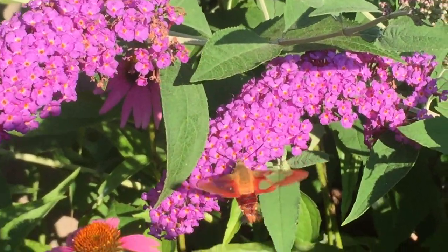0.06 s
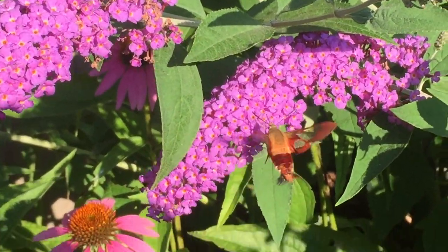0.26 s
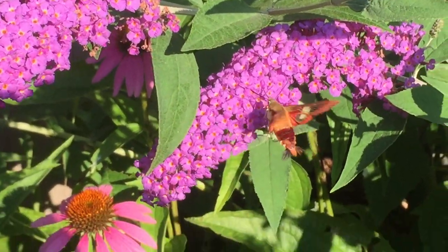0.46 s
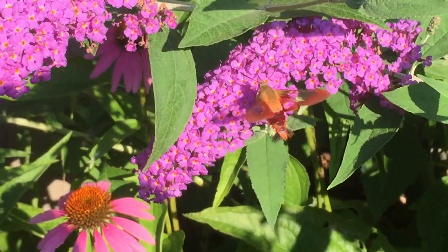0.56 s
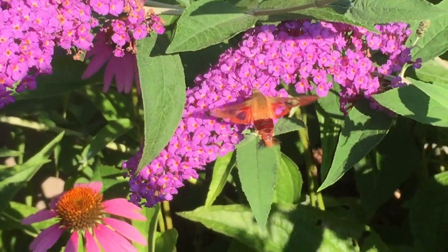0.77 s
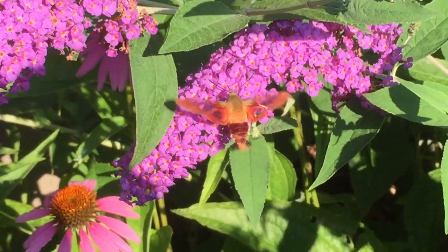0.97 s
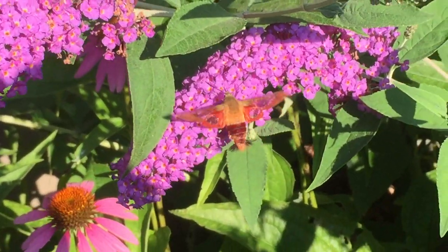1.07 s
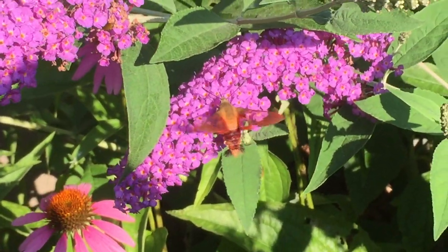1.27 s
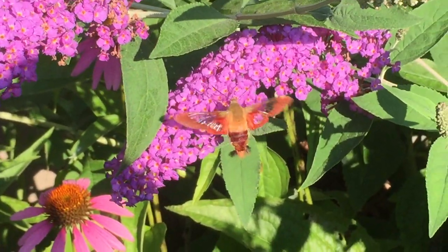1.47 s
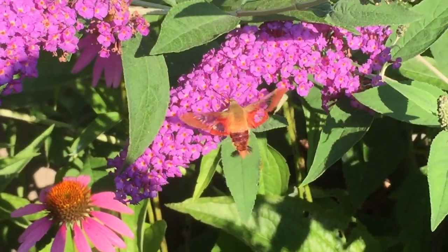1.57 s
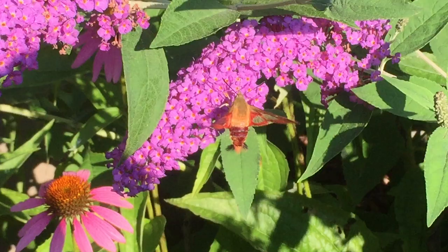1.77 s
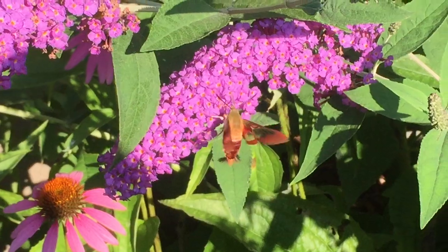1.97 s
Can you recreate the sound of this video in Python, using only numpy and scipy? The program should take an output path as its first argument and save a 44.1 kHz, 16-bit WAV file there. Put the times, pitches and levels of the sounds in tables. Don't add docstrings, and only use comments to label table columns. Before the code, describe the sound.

A cricket some way off trills about twelve near-pure high chirps a second over soft garden hiss; close to the hand-held microphone, dull thumps and two hollow knocks come in the first half second, then mostly calm.

```python
import sys
import numpy as np
from scipy import signal
from scipy.fft import rfft, irfft
from scipy.io import wavfile
from scipy.ndimage import uniform_filter1d

SR = 44100
rng = np.random.default_rng(int(sys.argv[2]) if len(sys.argv) > 2 else 0)


def gain_from_decibels(decibels):
    exponent = np.asarray(decibels, float) / 20
    return 10 ** exponent


def generate_wav(signal):
    frames = np.transpose(np.atleast_2d(signal))
    scaled = np.clip(frames, -1, 1) * 32767
    pcm = np.round(scaled).astype(np.int16)
    wavfile.write(sys.argv[1], SR, pcm)


N = 88200


def add(out, x, at_s):
    i = int(round(at_s * SR))
    a, b = max(i, 0), min(i + len(x), N)
    out[a:b] += x[a - i:b - i]


def walk(rate_hz):
    k = int(SR / rate_hz)
    steps = np.repeat(rng.standard_normal(N // k + 1), k)
    return 1.3 * uniform_filter1d(uniform_filter1d(steps, k), k)[:N]


def band(x, order, low_hz, high_hz):
    return signal.sosfilt(signal.butter(order, [low_hz, high_hz], "band", fs=SR, output="sos"), x)


def hiss(shape, db, swell_db, flicker_db, flicker_hz):
    f = np.maximum(np.fft.rfftfreq(N, 1 / SR), 1)
    hz, per_hz = np.array(shape, float).T
    colour_db = np.interp(np.log(f), np.log(hz), per_hz, left=-80, right=-80)
    spectrum = rfft(rng.standard_normal(N)) * gain_from_decibels(colour_db)
    out, swell = 0, walk(2.3)
    for k in range(8, 30):
        share = np.clip(1 - np.abs(2 * np.log2(f) - k), 0, 1)
        out = out + irfft(spectrum * share, N) * gain_from_decibels(swell_db * swell + flicker_db * walk(flicker_hz))
    return out * gain_from_decibels(db) / np.std(out)


# frequency in Hz, density in dB per Hz.
AIR = [(180, -19.5), (500, -23.5), (2300, -28.5), (3200, -32), (7000, -35.5), (10400, -42.5), (12500, -41),
       (15800, -45)]
# frequency in Hz, density in dB per Hz.
CHORUS = [(1700, -31), (1950, -1), (2250, -19), (2600, 0), (2800, -17)]


def garden_air():
    air = hiss(AIR, db=-71, swell_db=.25, flicker_db=.5, flicker_hz=12.57)
    return air + hiss(CHORUS, db=-82.5, swell_db=0.69, flicker_db=0.82, flicker_hz=25)


# frequency in Hz, density in dB per Hz.
RUMBLE = [(20, -27), (35, -10.5), (55, 5), (80, -5.5), (125, -2), (190, -13), (400, -36.5)]
# time in seconds, level in dB.
GRIP = [(0, 11), (.1, 8.5), (.3, 4), (.55, 4.5), (.8, 0.5), (1.3, 1), (2, 2.5)]


def hand_rumble():
    rumble = hiss(RUMBLE, db=-68.5, swell_db=0, flicker_db=3, flicker_hz=6.9)
    return rumble * gain_from_decibels(np.interp(np.arange(N) / SR, *np.array(GRIP).T))


# centre in seconds, peak in dB, pitch at the top of the arch in Hz.
CHIRPS = [(.043, -73, 5986), (.117, -76, 6094), (.196, -71, 6094), (.272, -66, 6126), (.357, -70.5, 6150),
          (.438, -73, 6140), (.519, -69.5, 6245), (.596, -69.5, 6239), (.68, -70, 6234),
          (.758, -68.7, 6250), (.839, -71, 6260), (.917, -68.8, 6266), (.997, -65, 6420),
          (1.081, -65.3, 6277), (1.163, -67, 6410), (1.244, -69.8, 6415), (1.325, -71.5, 6320),
          (1.409, -70, 6417), (1.489, -71, 6410), (1.569, -65.5, 6261), (1.648, -69.8, 6400),
          (1.73, -65, 6401), (1.808, -68.7, 6379), (1.888, -70.3, 6430), (1.967, -70.7, 6428)]
# delay in seconds, level in dB.
HEDGE_ECHOES = [
    (.006, -15),
    (.017, -16),
]


def cricket():
    rise_s, fall_s, rise_sharpness, fall_sharpness = 0.012, .013, 3.4, 1.8
    rise_sag_hz, fall_sag_hz = 70, 70
    sag_from_hz, sag_per_hz = 6100, .6
    out, t = np.zeros(N), np.arange(-.04, .04, 1 / SR)
    u = np.where(t < 0, -t / rise_s, t / fall_s)
    shape = np.exp(-u ** np.where(t < 0, rise_sharpness, fall_sharpness))
    for at, db, top_hz in CHIRPS:
        extra = sag_per_hz * max(top_hz - sag_from_hz, 0)
        sag = np.where(t < 0, rise_sag_hz + .3 * extra, fall_sag_hz + extra) * u ** 2
        tone = np.sin(2 * np.pi * np.cumsum(top_hz - sag) / SR)
        add(out, gain_from_decibels(db) * shape * tone, at + t[0])
    out = out * gain_from_decibels(-0.63 + 2.6 * walk(400))
    return out + sum(gain_from_decibels(db) * np.roll(out, int(s * SR)) for s, db in HEDGE_ECHOES)


def sagging_pulses(table, rise_cycles, fall_cycles, sag):
    out = np.zeros(N)
    for at, db, hz in table:
        cycles = np.arange(-3, 5, hz / SR)
        shape = np.exp(-(cycles / np.where(cycles < 0, rise_cycles, fall_cycles)) ** 2)
        tone = np.cos(2 * np.pi * (cycles - sag * cycles ** 2))
        add(out, gain_from_decibels(db) * shape * tone, at + cycles[0] / hz)
    return out


# centre in seconds, peak in dB, pitch in Hz.
BUMPS = [(.046, -55, 470), (.06, -52, 490), (.08, -55, 362), (.183, -56.5, 450), (.192, -55.5, 268),
         (.203, -55, 510), (.262, -55, 300), (.27, -48, 490), (.287, -38.5, 454), (.286, -54, 1000),
         (.29, -48, 286), (.443, -54, 487), (1.3775, -50.5, 480), (.32, -43, 484)]


def finger_bumps():
    return sagging_pulses(BUMPS, rise_cycles=0.69, fall_cycles=1.83, sag=0.024)


# centre in seconds, peak in dB, pitch in Hz.
THUMPS = [(.0549, -55, 150), (.0626, -44.5, 142), (.0634, -59.5, 58), (.0896, -45.5, 95.5),
          (.1201, -55, 107), (.155, -52.5, 102), (.1892, -43, 137), (.2068, -39, 81.3), (.2414, -61, 55),
          (.2493, -47.5, 123), (.2683, -46, 150), (.2885, -34.5, 155), (.2974, -37, 94), (.3123, -46.5, 70),
          (.3336, -32.5, 135), (.3459, -46.5, 75), (.4732, -48, 78), (.4878, -28, 121.6),
          (.5315, -45.5, 65), (.5507, -54, 61), (.6786, -51.5, 62.3), (.722, -54.5, 74), (.83, -64.5, 59),
          (1.0104, -47, 63), (1.082, -53.5, 61), (1.1743, -55.5, 60), (1.3944, -45, 92.4),
          (1.63, -51.5, 64), (1.83, -59, 55.4), (1.947, -57, 90)]


def grip_thumps():
    return sagging_pulses(THUMPS, rise_cycles=0.71, fall_cycles=1.29, sag=0.17)


# centre in seconds, level in dB, length in seconds, low Hz,
# high Hz.
RUSTLES_AND_BIRD = [
    (.12, -88, .04, 12500, 15000),
    (.27, -85, .04, 14000, 16000),
    (0.26, -74, 0.0082, 2800, 3300),
    (0.298, -78, 0.022, 2880, 3400),
    (.55, -83, .025, 11500, 15500),
    (0.546, -77.5, .01, 3050, 3700),
    (0.22, -87.5, .35, 11500, 15500),
]


def rustles_and_bird():
    out, t = np.zeros(N), np.arange(N) / SR
    for at, db, length_s, low_hz, high_hz in RUSTLES_AND_BIRD:
        breath = band(rng.standard_normal(N), 2, low_hz, high_hz)
        level = gain_from_decibels(db + 3.5 * walk(150))
        out += level * breath / np.std(breath) * np.exp(-((t - at) / length_s) ** 2)
    return out


# start in seconds, peak in dB.
TICKS = [(.13, -66), (.279, -68), (.335, -68), (.897, -66), (.98, -69), (1.03, -65), (1.145, -67),
         (1.33, -63), (1.53, -68), (1.63, -66), (1.93, -65)]


def leaf_ticks():
    tick_hz, fall_ms = 13000, .4
    out, t = np.zeros(N), np.arange(0, .003, 1 / SR)
    for at, db in TICKS:
        grain = rng.standard_normal(len(t))
        add(out, gain_from_decibels(db) * np.exp(-t * 1000 / fall_ms) * grain, at)
    return band(out, 2, .7 * tick_hz, 1.2 * tick_hz)


# start in seconds, ring in dB, tick in dB.
KNOCKS = [
    (0.3248, -23, -56.5),
    (.479, -19, -47),
]
# pitch in Hz, level in dB, fall in ms.
CASE = [(950, 6, 2.5), (1370, -5, 4), (1660, -7, 3.5), (2010, 2, 3), (2300, 0, 2), (3500, -14, 1),
        (4200, -12, 1.2)]


def knocks():
    ring_hz, sharp_hz, settle_ms = 503.8, 300, 1.17
    ring_late_ms, ring_rise_ms, ring_fall_ms, tick_rise_ms = 0.79, 1.49, 7.34, .9
    out, t = np.zeros(N), np.arange(0, .05, 1 / SR)
    ms = t * 1000
    tick = np.zeros(len(t))
    for k, (hz, db, fall_ms) in enumerate(CASE):
        sign = (-1) ** k
        tick += sign * gain_from_decibels(db) * np.exp(-ms / fall_ms) * np.sin(2 * np.pi * hz * t)
    tick = tick * (1 - np.exp(-(ms / tick_rise_ms) ** 2))
    pitch = ring_hz + sharp_hz * np.exp(-ms / settle_ms)
    shape = (1 - np.exp(-(ms / ring_rise_ms) ** 2)) * np.exp(-(ms / ring_fall_ms) ** 1.45)
    ring = shape * np.sin(2 * np.pi * np.cumsum(pitch) / SR)
    for at, ring_db, tick_db in KNOCKS:
        add(out, gain_from_decibels(tick_db) * tick, at)
        add(out, gain_from_decibels(ring_db) * ring, at + ring_late_ms / 1000)
    return out


def scene():
    garden = garden_air() + cricket() + leaf_ticks()
    hand = hand_rumble() + finger_bumps() + grip_thumps() + knocks()
    return (garden + hand + rustles_and_bird())[None]


def band_limit(x):
    return signal.sosfilt(signal.butter(12, 15710, fs=SR, output="sos"), x)


# centre in Hz, width in Hz, depth from 0 to 1.
PORT_DIPS = [(565, 132, 0.34), (4910, 300, 0.35), (10620, 770, 0.25)]


def record(dry):
    for hz, width_hz, depth in PORT_DIPS:
        dry = dry - depth * signal.lfilter(*signal.iirpeak(hz, hz / width_hz, fs=SR), dry)
    low_cut = signal.butter(2, 27.5, "high", fs=SR, output="sos")
    top_cut = signal.ellip(10, .3, 70, 15700, fs=SR, output="sos")
    heard = signal.sosfilt(top_cut, signal.sosfiltfilt(low_cut, dry))
    return band_limit(heard)


dry = scene()
out = record(dry)
generate_wav(out)
```